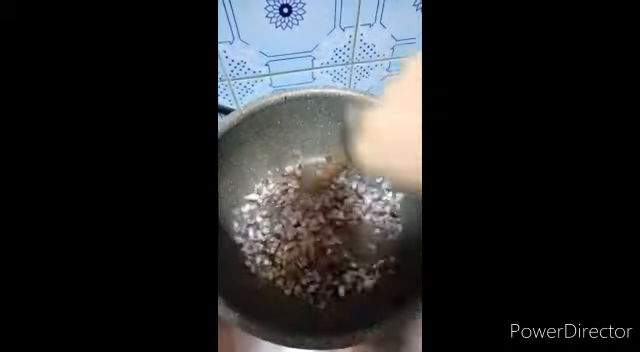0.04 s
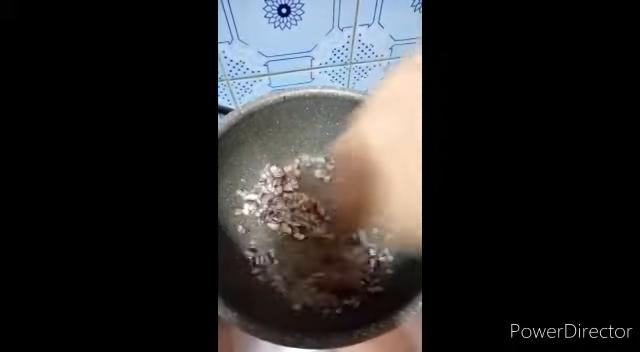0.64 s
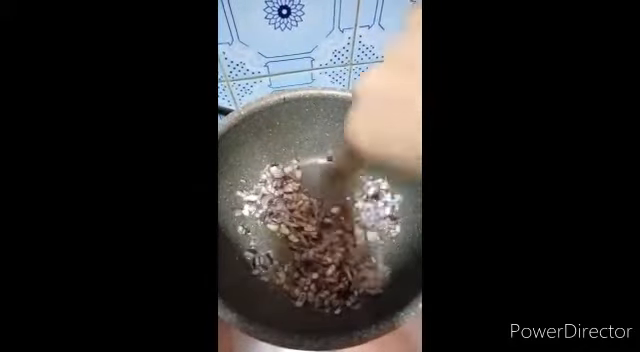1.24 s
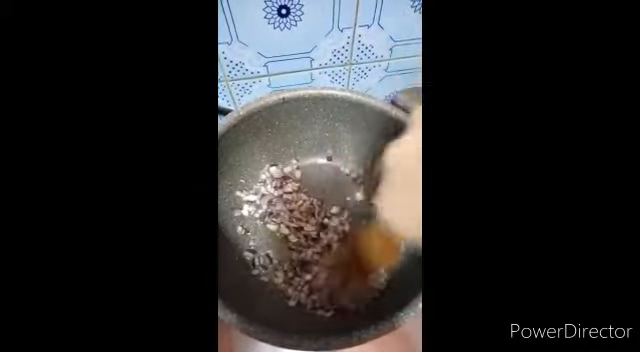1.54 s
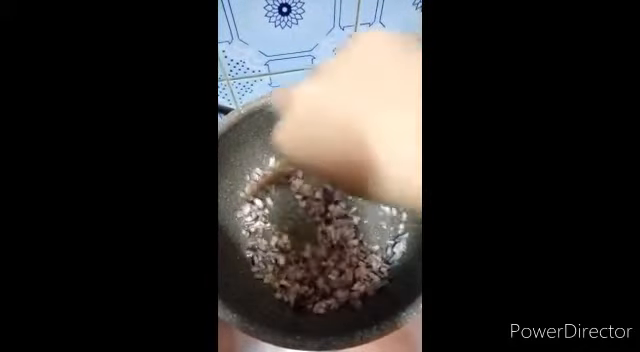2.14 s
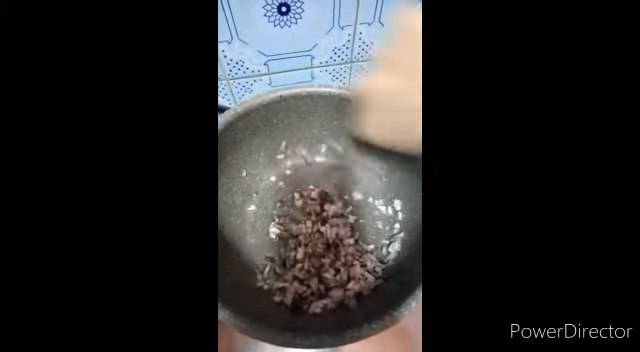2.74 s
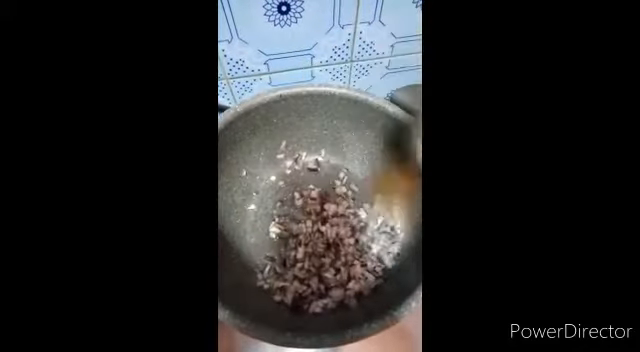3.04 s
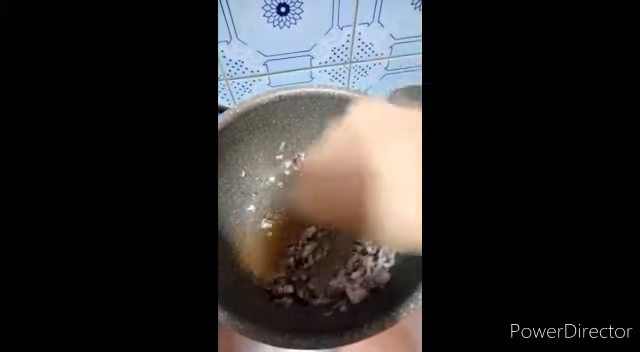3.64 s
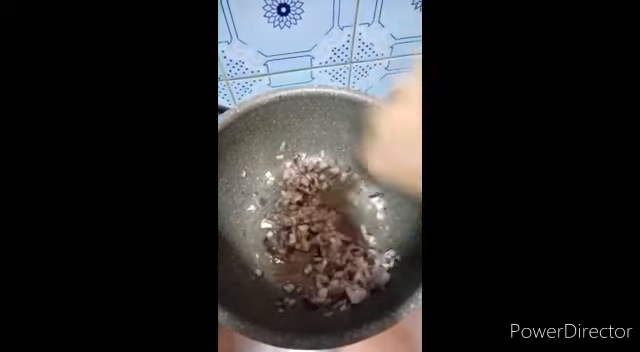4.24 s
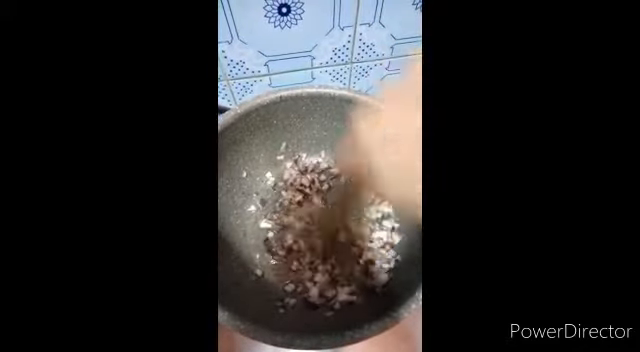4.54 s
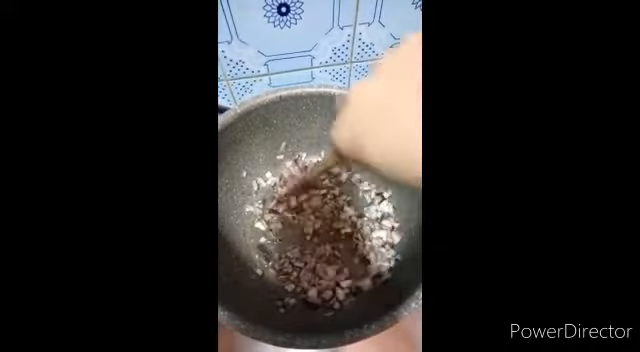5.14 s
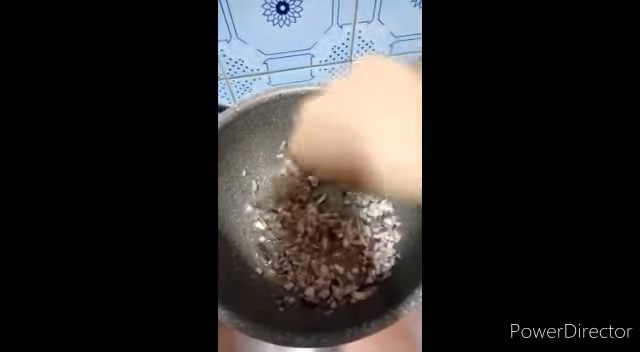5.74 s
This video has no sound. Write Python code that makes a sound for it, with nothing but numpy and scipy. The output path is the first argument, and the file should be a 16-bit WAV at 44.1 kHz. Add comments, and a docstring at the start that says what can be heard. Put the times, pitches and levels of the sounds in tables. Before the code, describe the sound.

Chopped onion sizzles in hot oil throughout, a fine, high crackling hiss heard up close in a small tiled kitchen with a short echo. From the start a wooden spatula stirs it, about three strokes a second: hollow knocks that make the pan ring briefly, mixed with short, rough scrapes and the odd slight squeak. Firm knocks land at about 0.1, 0.9, 1.1, 1.4, 2.0 and 2.6 seconds. Droplets spit sharply around 0.5, 0.8 and 2.7 seconds, the last along with a longer scrape. After another ringing tap at 3 seconds the sizzle is softer and the stirring lighter, with gentle taps near 3.4 and 4.1 seconds, a brief hiss of steam at 4.3 and a squeaky scrape at 4.8. One more firm knock comes at about 5.7 seconds, and the quiet frying carries on to the end at 6 seconds.

```python
"""Frying and stirring onion

Chopped onion sizzles in a deep pan in a small tiled kitchen: steam bubbles burst in the hot oil
and droplets spit. A wooden spatula knocks on the pan, which rings briefly, and scrapes the onion
across it, about three strokes a second. The sizzle dies down as the onion is heaped up."""
import sys
import numpy as np
from scipy import signal
from scipy.fft import rfft, irfft, next_fast_len
from scipy.io import wavfile
from scipy.ndimage import uniform_filter1d

SR = 44100
rng = np.random.default_rng(int(sys.argv[2]) if len(sys.argv) > 2 else 0)


def master(y):
    """Save y as 16-bit WAV."""
    cut = np.clip(np.atleast_2d(y).T, -1, 1)
    pcm = np.round(cut * 32767)  # scale
    wavfile.write(sys.argv[1], SR, pcm.astype(np.int16))


N = 263718
TIME = np.arange(N) / SR


def from_db(db):
    """Turn decibels into a number to multiply by."""
    return 10 ** (np.asarray(db) / 20)


def rms_one(x):
    """Scale a sound so that its average strength (rms) is one."""
    return x / np.sqrt(np.mean(x ** 2) + 1e-20)


def burst_one(x):
    """Scale a sound so that its loudest hundredth of a second has strength one."""
    return x / np.sqrt(uniform_filter1d(x ** 2, size=441, mode="constant").max() + 1e-20)


def in_time(rows):
    """Join the rows of a table into curves, one value per sample."""
    s, *columns = np.transpose(rows)
    return [np.interp(TIME, s, c) for c in columns]


def add(out, s, sound):
    """Mix a sound in at s seconds."""
    at = max(round(s * SR), 0)
    out[at:at + len(sound)] += sound[:N - at]


def band(x, low_hz, high_hz):
    """Keep the part of a sound between two frequencies."""
    edges = np.clip([low_hz, high_hz], 20, .47 * SR)
    return signal.sosfilt(signal.butter(3, edges, "band", fs=SR, output="sos"), x + 1e-18)


def colour(x, spectrum):
    """Turn each frequency up or down as a table says."""
    size = 2 * next_fast_len(len(x))
    hz, db = np.transpose(spectrum)
    log_hz = np.log(np.fft.rfftfreq(size, 1 / SR) + 1)
    log_gain = np.log(from_db(np.interp(log_hz, np.log(hz), db)))
    # minimum phase: the filter never sounds ahead of a click
    cepstrum = irfft(log_gain)[:size // 2]
    cepstrum[1:] *= 2
    return irfft(rfft(x, size) * np.exp(rfft(cepstrum, size)))[:len(x)]


def fade(t, t60):
    """A dying away that loses 60 dB in t60 seconds, the fade time."""
    return np.exp(-np.log(1000) * t / t60)


def tone(t, hz, t60):
    """A pure note that dies away."""
    return np.sin(2 * np.pi * hz * t) * fade(t, t60)


def ring(force, hz, t60):
    """Every push sets the same dying note ringing."""
    decay, step = from_db(-60 / (t60 * SR)), 2 * np.pi * hz / SR
    return signal.lfilter([0, np.sin(step)], [1, -2 * decay * np.cos(step), decay ** 2], force + 1e-18)


def waver(count, hz):
    """Smooth random movement, up to about hz wiggles a second."""
    noise = rng.standard_normal(count + SR // 8)
    return rms_one(signal.sosfilt(signal.butter(2, hz, fs=SR, output="sos"), noise)[-count:])


def resonance(hz, width_hz):
    """An unsteady note that follows a pitch curve; the wider, the noisier."""
    phase = 2 * np.pi * np.cumsum(hz) / SR
    return waver(len(hz), width_hz / 2) * np.cos(phase) + waver(len(hz), width_hz / 2) * np.sin(phase)


def grains(count, per_s, spread_db):
    """Random clicks, many small and a few large."""
    sizes = from_db(spread_db * np.minimum(rng.exponential(1, count), 6))
    return sizes * rng.choice([-1, 1], count) * (rng.random(count) < per_s / SR)


def bursts(per_s, spread_db):
    """A stream of popping bubbles, held at an even average strength."""
    clicks = grains(N, per_s, spread_db)
    return clicks / np.sqrt(uniform_filter1d(clicks ** 2, size=SR // 2) + 1e-12)


# Levels in all tables are relative: the layers are turned up or down as they are mixed.
# How hard the onion fries: t/s, sizzle/dB, spray/dB
FRYING_LEVELS = [(0.0, -45.5, -62), (0.17, -53.5, -62.5), (0.43, -53.5, -65), (0.7, -52, -63),
                 (0.88, -46.5, -61), (0.98, -50, -62.5), (1.46, -54.5, -67.5), (2.2, -53.5, -69.5),
                 (2.36, -53, -66), (2.65, -58.5, -70), (3.0, -55.5, -79), (3.13, -60.5, -77),
                 (3.48, -61, -91), (4.06, -61.5, -88), (4.38, -57, -87), (5.15, -60, -80),
                 (5.54, -58.5, -79), (5.98, -61, -74.5)]
# Tone colours of the sizzle and of the finer spray: f/Hz, level/dB
SIZZLE_COLOUR = [(1020, -10.5), (2420, -18), (3250, -11), (3600, -2.5), (3850, -2.5), (4180, 5),
                 (4620, -6.5), (5400, 5.5), (5750, 7), (6080, 7), (6600, -2.5), (7130, 1.5), (7600, -5),
                 (8100, -32), (9150, -22), (15450, -72.5)]
SPRAY_COLOUR = [(5100, -18), (7350, 4), (8350, 2), (9300, -4.5), (9800, -3), (10200, 4), (10550, 0),
                (11000, 4), (12000, -7), (15400, -14)]
def frying(bubbles_per_s, spray_db, hiss_db):
    """Steam bubbles burst in the oil by the thousand, over a smooth hiss."""
    sizzle_level, spray_level = in_time(FRYING_LEVELS) + flares()
    # wetter onion sprays more and bursts less evenly
    spread_db = 5 + 0.2 * (spray_level - spray_level.mean())
    steam = bursts(bubbles_per_s, spread_db) + from_db(hiss_db) * rng.standard_normal(N)
    sizzle = from_db(sizzle_level) * rms_one(colour(steam, SIZZLE_COLOUR))
    spray = from_db(spray_level + spray_db) * rms_one(colour(steam, SPRAY_COLOUR))
    return sizzle + spray


def fizz(gain_db, spread_db, per_s=170, centre_hz=10780, octaves=0.073):
    """Tiny bubbles ring in the wet onion, each at its own pitch; their loudness follows the spray."""
    out, t = np.zeros(N), TIME[:2048]
    for at, pitch, size in rng.random((int(per_s * N / SR), 3)):
        hz = centre_hz * 2 ** (octaves * (2 * pitch - 1))
        add(out, at * TIME[-1], from_db(-spread_db * size) * tone(t, hz, t60=0.013))
    _, spray_level = in_time(FRYING_LEVELS)
    return from_db(spray_level + gain_db) * rms_one(out)


# Loudness of the finest mist: t/s, level/dB
MIST_LEVELS = [(0, -67), (.7, -71), (.95, -62), (1.4, -68.5), (2.1, -67), (2.72, -66), (3.2, -75),
               (3.65, -72.5), (4.15, -78), (4.36, -72), (4.75, -76), (5.2, -78), (5.7, -73), (5.98, -79)]
# Its tone colour: f/Hz, level/dB
MIST_TREBLE = [(7000, -11), (11500, -4.5), (13500, -1), (15400, -1.5)]
def mist(per_s, spread_db, hiss_db):
    """The smallest bursts of all make a fine, very high crackle."""
    crackle = bursts(per_s, spread_db) + from_db(hiss_db) * rng.standard_normal(N)
    return from_db(in_time(MIST_LEVELS)[0]) * rms_one(colour(crackle, MIST_TREBLE))


# Tone colour of the quiet room: f/Hz, level/dB
ROOM_COLOUR = [(25, 8), (60, 8.5), (150, 18), (300, 9.5), (700, 0.5), (1200, 0), (2500, -4), (8000, -5.5),
               (15500, -21)]
def background(level_db):
    """A faint, steady, low rush fills the room."""
    return from_db(level_db) * rms_one(colour(rng.standard_normal(N), ROOM_COLOUR))


def small_spits(per_s=28, hz=5500, over_sizzle_db=5, over_spray_db=15):
    """Small droplets come at random and follow the frying's loudness: rows like those of BIG_SPITS."""
    times, sizzle_db, spray_db = np.transpose(FRYING_LEVELS)
    rows = []
    for at, size in rng.random((int(per_s * N / SR), 2)):
        s, size_db = at * TIME[-1], 10 * np.log10(size)
        snap_db = np.interp(s, times, sizzle_db) + over_sizzle_db + size_db
        puff_db = np.interp(s, times, spray_db) + over_spray_db + size_db
        rows.append((s, snap_db, hz, puff_db))
    return rows


# The largest droplets: t/s, snap/dB, snap pitch/Hz, puff/dB
BIG_SPITS = [(.4664, -34, 6000, -33.5), (0.485, -34, 5740, -37), (0.788, -34.5, 5500, -39),
             (2.702, -32.5, 5560, -54), (2.7246, -35.5, 5070, -57), (3.459, -39.5, 4370, -70),
             (3.805, -46, 4700, -67), (4.411, -41, 5300, -68)]
# Tone colour of the puff: f/Hz, level/dB
PUFF_COLOUR = [(5000, -5.5), (7500, 10.5), (9200, 2), (10900, 11), (12500, -4.5), (15400, -20)]
def spits(gain_db, splash_s, octaves):
    """A droplet bursts with a snap and a puff of spray, gone in a few thousandths of a second."""
    out, t = np.zeros(N), TIME[:1024]
    for s, snap_db, hz, puff_db in BIG_SPITS + small_spits():
        burst = rng.standard_normal(len(t)) * np.exp(-t / splash_s)
        snap = band(burst, hz / 2 ** (octaves / 2), hz * 2 ** (octaves / 2))
        puff = colour(burst, PUFF_COLOUR)
        add(out, s, from_db(snap_db) * snap / np.abs(snap).max())
        add(out, s, from_db(puff_db) * puff / np.abs(puff).max())
    return from_db(gain_db) * out


# The notes the pan rings with: f/Hz, level/dB, fade time/s
PAN_NOTES = [(155, 3, .42), (231, -2, .35), (281, -1, .42), (336, -4, .22), (392, -1, .3), (501, -13, .3),
             (606, -7, .25), (763, -8, .25), (926, -7, .2), (1032, -7, .2), (1195, 1, .3), (1362, -13, .22),
             (1530, -11, .12), (1920, -2, .2), (2207, -10, .15), (2400, -7, .12), (2665, -3, .16),
             (2830, -5, .2), (3400, -12, .1), (3950, -6, .1), (4130, -6, .12), (5160, -2, .15),
             (5500, -4, .12), (5800, -6, .11), (6070, -4, .12), (7050, -7, .08), (7800, -12, .06)]
def pan_ring(t, low_hz, high_hz, uneven_db=1.0, bend_share=0.0046, bend_hz=24):
    """The struck pan's notes in one pitch range; the shifting spatula bends each a little."""
    out = np.zeros(len(t))
    for hz, db, t60 in PAN_NOTES:
        if .9 * low_hz <= hz < 1.1 * high_hz:
            strength = from_db(db + rng.normal(0, uneven_db)) * rng.choice([-1, 1])
            pitch = hz * (1 + bend_share * waver(len(t), bend_hz))
            out += strength * np.sin(2 * np.pi * np.cumsum(pitch) / SR) * fade(t, t60)
    return out


FIRM_DB = -42.5   # the thump of a firm knock: heavier ones clang more, lighter ones less
# Six pitch ranges of a knock: low/Hz, high/Hz, swell/s, fade time/s, ring compared with contact/dB
KNOCK_RANGES = [(133.5, 255, 0.00071, 0.26, 3), (235, 550, 0.00061, 0.24, 4.5),
                (669.7, 1400, 0.0003, 0.26, 2.5), (1380, 2000, .0004, 0.089, -24.5),
                (1995, 3300, 0.00059, 0.015, -1.5), (4240, 7200, 0.0006, 0.033, -11)]
# The spatula lands: t/s, thump/dB, thump pitch/Hz, cushioning by onion/s, wood pitch/Hz, wood/dB,
# low note/Hz, low note/dB, click on bare metal/dB, click pitch/Hz, high note/Hz, its width/Hz,
# high note/dB, fade time of both notes/s
KNOCKS = [(0.0687, -26.5, 270, 0.00051, 407, -32.5, 599, -33.5, -20, 4660, 2753, 870, -34, 0.066),
          (.338, -33.5, 230, 0.00077, 385, -47, 637, -39, -58, 5000, 4200, 300, -62, 0.051),
          (.399, -33, 226, .001, 385.5, -40, 334, -36, -45, 4200, 4280, 300, -48, 0.081),
          (0.5947, -41, 255, .001, 400, -36.5, 560, -36.5, -40, 3300, 2396, 200, -43, 0.044),
          (0.846, -34.5, 308, 0.0051, 376, -47, 577, -34.5, -20, 4100, 5100, 486, -30, 0.063),
          (.906, -27.5, 200, 0.0041, 379, -35.5, 299, -27, -43, 5500, 5670, 648.1, -47, 0.044),
          (1.113, -26, 244, 0.00078, 387, -30, 1204, -34.5, -30.5, 3870, 2680, 432, -58, 0.2),
          (1.3873, -30.5, 255, 0.0049, 362, -33, 1205, -43.5, -28, 3800, 2730, 277.8, -36, 0.042),
          (1.655, -38, 194, .002, 318, -43, 283, -58, -43.5, 6200, 6870, 560, -39.5, 0.032),
          (1.986, -26, 270, 0.0022, 341, -24.5, 1198, -39, -61, 3000, 2840, 400, -60, .08),
          (2.054, -42, 1140, .001, 400, -60, 1293, -39.5, -36.5, 3150, 3380, 231.5, -43, 0.037),
          (2.297, -37.5, 267, .003, 404, -37, 542, -43.5, -62, 2700, 2760, 432, -75, .07),
          (2.575, -25, 263, 0.00098, 409, -31, 1921, -32.5, -22.5, 3730, 2690, 199, -46, 0.15),
          (2.6174, -34, 250, 0.0012, 328, -38, 290, -27, -37.5, 2600, 2620, 330, -44, 0.032),
          (2.989, -34, 237, 0.0026, 399, -34, 156, -43, -24.5, 4240, 2805, 199, -38.5, 0.37),
          (3.384, -39, 175, 0.0022, 324, -40, 1188, -48.5, -76, 3000, 2700, 400, -69, 0.052),
          (4.0, -48, 219, 0.0093, 300, -81, 523, -50, -42, 3900, 2480, 259.3, -45, 0.097),
          (4.07, -38.5, 256, 0.0035, 426, -39, 606, -39.5, -51, 5430, 5400, 700, -66, 0.13),
          (4.116, -38, 185, .002, 403, -37, 586, -50.5, -61, 5560, 4310, 432, -53, 0.068),
          (4.572, -51, 140, 0.0022, 304, -64, 155, -50, -53, 5640, 5570, 756, -60, 0.12),
          (5.288, -43.5, 410, 0.0035, 318, -44, 432, -47, -57, 5370, 3200, 500, -61.5, 0.14),
          (5.749, -27, 240, 0.0041, 383, -31.5, 1217, -33, -35.5, 3500, 2635, 416.7, -39.5, 0.05)]
def knocks(held_db, cushion_hz=1550):
    """Wood hits pan: a dull contact, the pan's ring, hollow wood and two notes set by where it lands."""
    out, t = np.zeros(N), TIME[:SR * 2 // 5]
    cushion = signal.butter(8, cushion_hz, fs=SR, output="sos")
    for (s, thump_db, thump_hz, soft_s, wood_hz, wood_db, low_hz, low_db,
         click_db, click_hz, high_hz, width_hz, high_db, note_t60) in KNOCKS:
        levels = range_levels(thump_db, thump_hz, click_db, click_hz)
        for level_db, (low, high, swell_s, t60, ring_db) in zip(levels, KNOCK_RANGES):
            contact = burst_one(band(rng.standard_normal(len(t)) * fade(t, t60), low, high))
            # a spatula that stays on the metal holds the ring down
            ringing = from_db(ring_db + held_db) * burst_one(pan_ring(t, low, high))
            hit = (contact + ringing) * (1 - np.exp(-t / swell_s))
            if low < 1000:   # onion softens the low ranges
                hit = signal.sosfilt(cushion, hit * (1 - np.exp(-t / soft_s)))
            add(out, s, from_db(level_db) * burst_one(hit))
        wood = tone(t, wood_hz, t60=0.065) * (1 - np.exp(-t / 0.0056)) ** 2
        add(out, s, from_db(wood_db) * burst_one(wood))
        # the low note is clear; higher up, many notes crowd into one rough one
        low_note = tone(t, low_hz, note_t60)
        high_note = resonance(np.full(len(t), high_hz), width_hz) * fade(t, note_t60)
        for note, hz, db in (low_note, low_hz, low_db), (high_note, high_hz, high_db):
            add(out, s, from_db(db) * burst_one(note * (1 - np.exp(-t * hz)) ** 2))
    return out


def range_levels(thump_db, thump_hz, click_db, click_hz):
    """The thump feeds the three low ranges, the click the three high ones, most near their own pitch."""
    centres = np.array([np.sqrt(low * high) for low, high, *_ in KNOCK_RANGES])
    # 13 and 18 dB weaker for each octave away
    thud, body, clang, *_ = thump_db - 13 * np.abs(np.log2(centres / thump_hz))
    *_, clack, tap, crack = click_db - 18 * np.abs(np.log2(centres / click_hz))
    clang += 0.62 * (thump_db - FIRM_DB)
    return thud, body, clang, clack, tap, crack


def flares(firm_rise_db=0.5, peak_s=0.027):
    """Each knock turns wet onion onto hot metal: the frying's brief rise in dB, more for heavy knocks."""
    out = np.zeros(N)
    for s, thump_db, *_ in KNOCKS:
        age = np.maximum(TIME - s, 0) / peak_s
        out += firm_rise_db * np.sqrt(from_db(thump_db - FIRM_DB)) * age * np.exp(1 - age)
    return out


# The spatula slides (low pitch: through onion, middle: on bare metal, high: squeezing out steam):
# peak t/s, length/s, level/dB, f/Hz
SLIDES = [(0.092, .058, -44, 3400), (0.142, .04, -46, 860), (.383, 0.016, -43, 1250),
          (0.376, 0.02, -40.5, 4700), (.47, 0.14, -47.5, 250), (0.635, 0.032, -41.5, 707),
          (0.626, 0.039, -48, 3420), (0.867, 0.038, -41.5, 2760), (0.901, 0.03, -35, 795),
          (1.032, .14, -43, 269), (1.689, .041, -47.5, 275), (1.922, .03, -61, 1130),
          (1.966, .05, -54.5, 320), (2.063, 0.025, -45, 1980), (2.365, 0.057, -42, 328),
          (2.393, .027, -48.5, 1820), (2.394, 0.034, -47.5, 785), (2.701, .13, -40, 224),
          (2.749, 0.097, -49, 5400), (2.759, .063, -53.5, 1590), (3.11, 0.096, -59.5, 990),
          (3.39, .02, -46.5, 670), (3.416, .037, -42, 280), (3.759, 0.027, -60.5, 540),
          (3.82, 0.082, -62.5, 190), (3.798, .16, -71.5, 1300), (4.096, 0.033, -51, 740),
          (4.18, .045, -48.5, 217), (4.3, 0.13, -49, 5520), (4.252, 0.075, -67, 7900),
          (4.314, 0.0034, -37.5, 6950), (4.607, .038, -52, 147), (4.841, .016, -41, 796),
          (4.828, 0.033, -57, 2350), (4.834, 0.011, -49, 5300), (5.289, 0.032, -54.5, 6100),
          (5.843, 0.031, -60, 1310)]
def scrapes(slips_per_s, spread_db, ring_db, damped_share, rise_share=.45):
    """The spatula sticks and slips; its tiny jolts rasp and ring the pan, whose ring it cuts short."""
    out, t = np.zeros(N), TIME[:SR * 3 // 4]
    for s, length, level_db, hz in SLIDES:
        rise, fall = length * rise_share, length * (1 - rise_share)
        start = max(s - 3 * rise, 0)
        since = t + start - s
        pressure = np.exp(-.5 * (since / np.where(since < 0, rise, fall)) ** 2)
        # compared with one at 1000 Hz, a higher scrape slips faster and spans fewer octaves
        slips = grains(len(t), slips_per_s * (hz / 1000) ** .8, spread_db)
        octaves = 1.267 - 0.17 * np.log2(hz / 1000)
        jolts = band(slips * pressure, hz / 2 ** (octaves / 2), hz * 2 ** (octaves / 2))
        ringing = sum(from_db(db) * rng.choice([-1, 1]) * ring(jolts, note_hz, t60 * damped_share)
                      for note_hz, db, t60 in PAN_NOTES)
        rasp = rms_one(rms_one(jolts) + from_db(ring_db) * rms_one(ringing))
        add(out, start, from_db(level_db) * np.sqrt(np.mean(pressure ** 2)) * rasp)
    return out


# Short squeals: peak t/s, length/s, level/dB, f/Hz, width/Hz
SQUEAL_NOTES = [(0.146, 0.012, -47, 1230, 130), (0.398, 0.02, -48.5, 1284, 199),
                (0.632, 0.02, -50, 948, 218), (2.739, 0.046, -52.5, 5250, 220),
                (2.771, 0.064, -59, 4085, 220), (2.753, 0.067, -52, 940, 260),
                (2.771, 0.038, -47, 1230, 107), (4.845, 0.021, -45.5, 1039, 220),
                (4.84, 0.015, -49, 1459, 220), (5.0, 0.27, -67.5, 4145, 423), (5.842, 0.035, -64, 1960, 90)]
def squeals(gain_db, octaves_per_s=0.054):
    """The spatula chatters on bare metal or trapped steam hisses: a rough note that creeps upward."""
    out = np.zeros(N)
    for s, length, level_db, hz, width_hz in SQUEAL_NOTES:
        start = max(s - .5, 0)
        since = TIME[:SR] + start - s
        swell = np.exp(-2 * (since / length) ** 2)
        squeal = resonance(hz * 2 ** (octaves_per_s * since), width_hz) * swell
        add(out, start, from_db(level_db + gain_db) * burst_one(squeal))
    return out


# Tone colour of the pan's bowl: f/Hz, level/dB
BOWL_COLOUR = [(3400, 0), (4100, 4), (4620, -6.5), (5200, 3), (6050, 4), (6550, -5.5), (7150, 1),
               (7900, -1), (9000, -5)]
def bowl(x, low_cut_hz=22.6):
    """The pan colours the spatula's sounds; rumble too deep to hear is filtered out."""
    low_cut = signal.butter(5, low_cut_hz, "high", fs=SR, output="sos")
    return signal.sosfilt(low_cut, colour(x, BOWL_COLOUR))


def kitchen(x, echo_db, first_echo_s=0.0065, t60=0.31):
    """Close tiled walls add a short, dense tail of echoes."""
    t = TIME[:SR // 2]
    tail = rng.standard_normal(len(t)) * fade(t, t60) * (t > first_echo_s)
    return x + from_db(echo_db) * signal.fftconvolve(x, tail / np.linalg.norm(tail))[:N]


def scene():
    """Spatula and frying in the kitchen, over its quiet background."""
    knocking = from_db(-2.0) * kitchen(knocks(held_db=-7.5), echo_db=-6.0)
    sliding = scrapes(slips_per_s=900, spread_db=2.0, ring_db=-7.5, damped_share=0.21)
    strokes = from_db(-1.5) * kitchen(sliding + squeals(gain_db=6.5), echo_db=-6.5)
    spatula = bowl(knocking + strokes)
    bubbles = frying(bubbles_per_s=7500, spray_db=-2.5, hiss_db=-1.0)
    bubbles += fizz(gain_db=-8.5, spread_db=24.0)
    bubbles += mist(per_s=5600, spread_db=4.0, hiss_db=-6.0)
    oil = kitchen(bubbles + spits(gain_db=4.5, splash_s=0.0022, octaves=0.45), echo_db=-8.5)
    return (spatula + oil + background(level_db=-65.5))[None]


def record(dry):
    """The highest treble is cut off steeply."""
    cutoff_hz = 15550
    return signal.sosfilt(signal.ellip(10, .3, 70, cutoff_hz, fs=SR, output="sos"), dry)


dry = scene()
out = record(dry)
master(out)
```